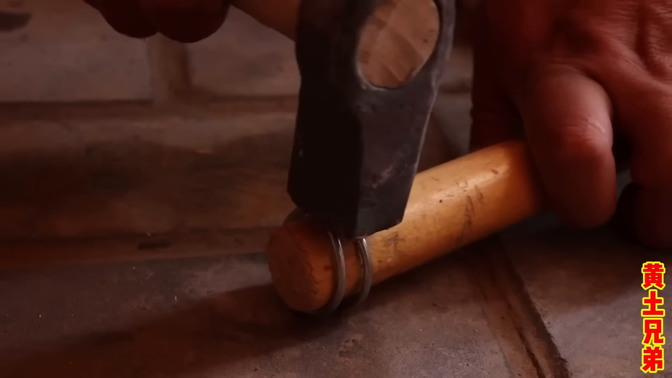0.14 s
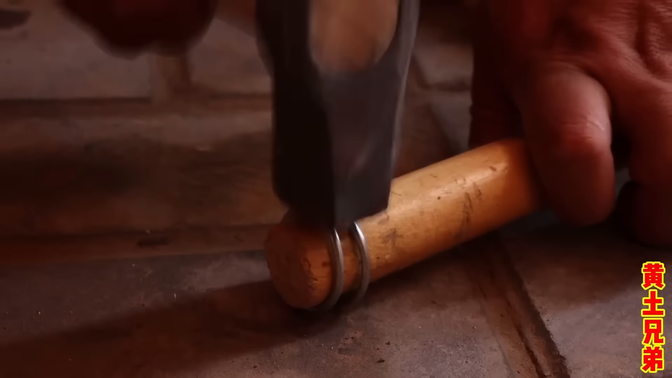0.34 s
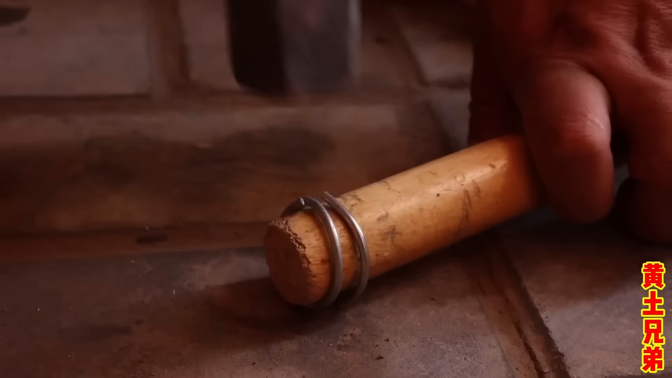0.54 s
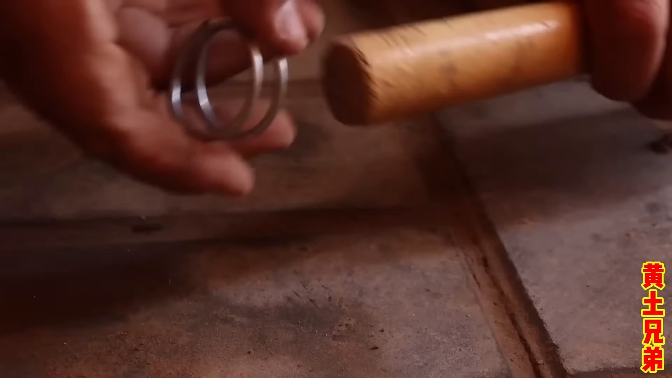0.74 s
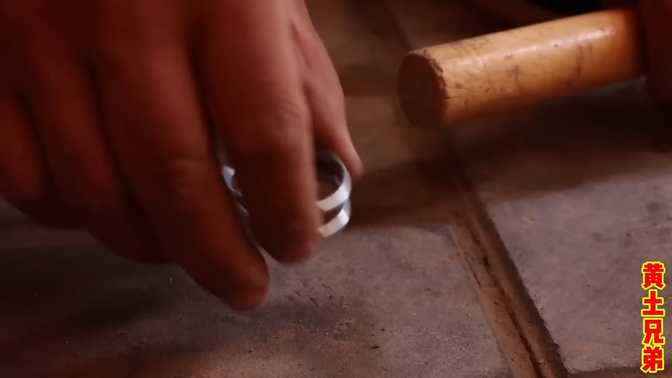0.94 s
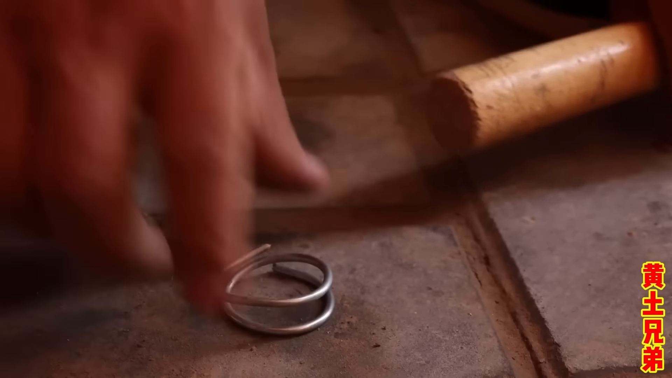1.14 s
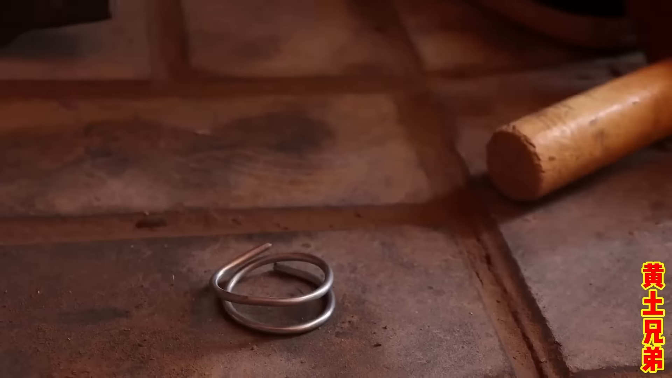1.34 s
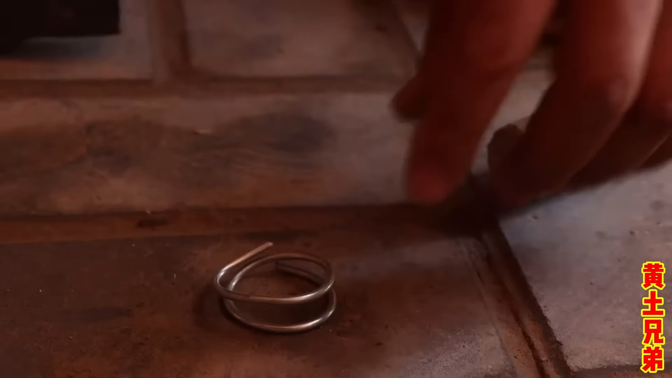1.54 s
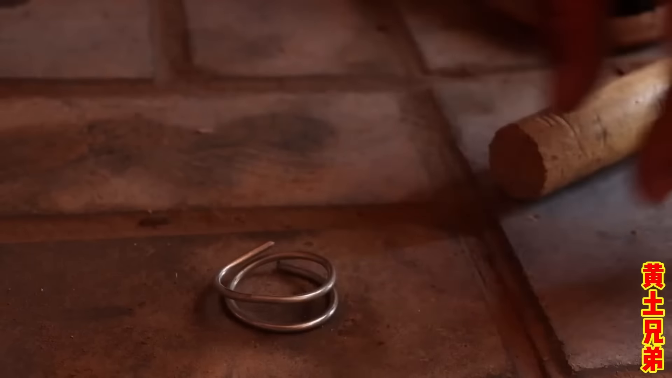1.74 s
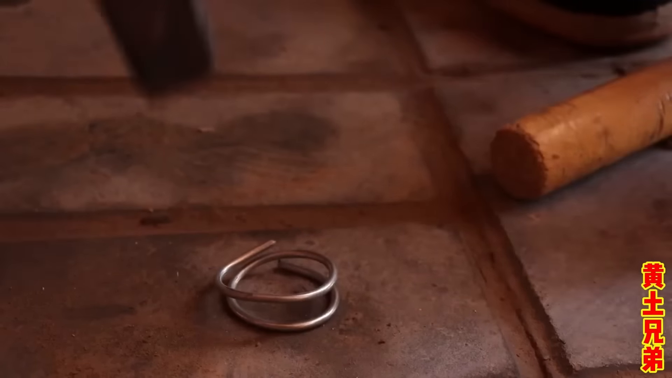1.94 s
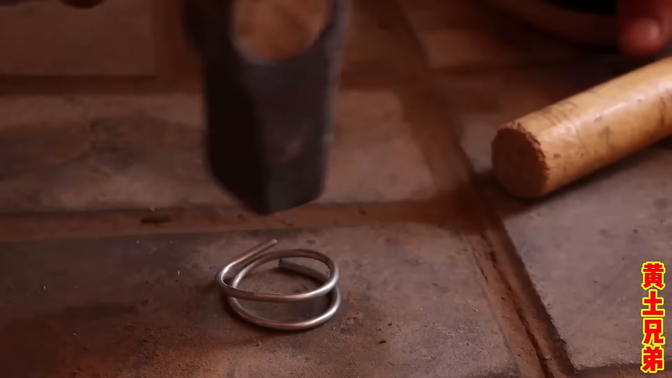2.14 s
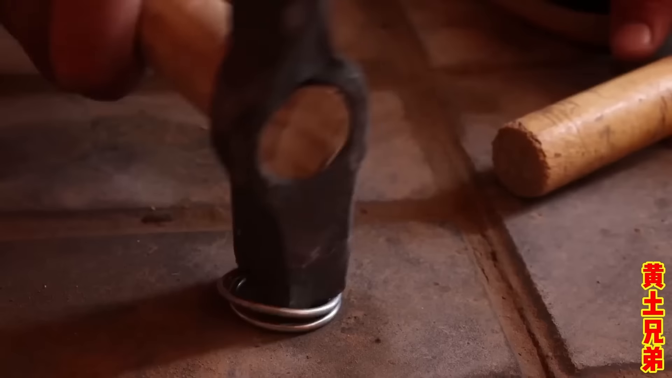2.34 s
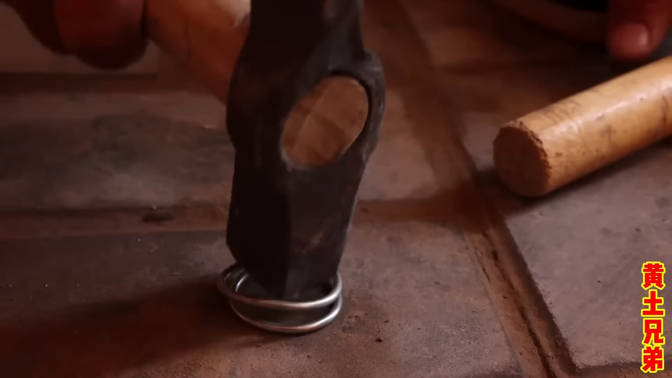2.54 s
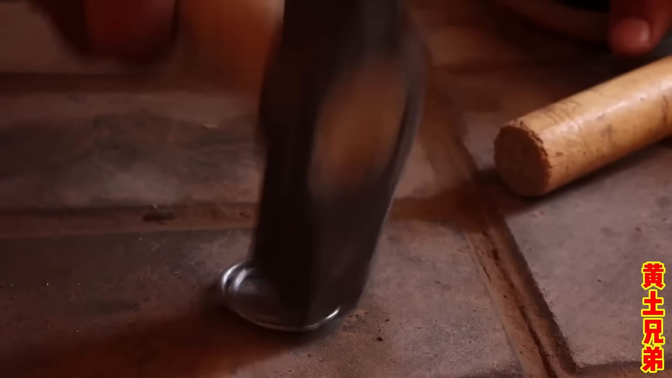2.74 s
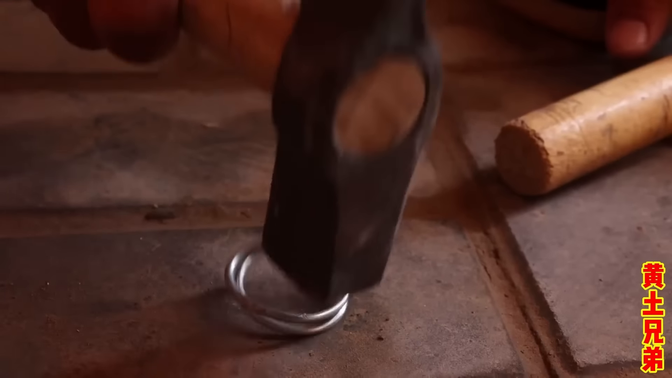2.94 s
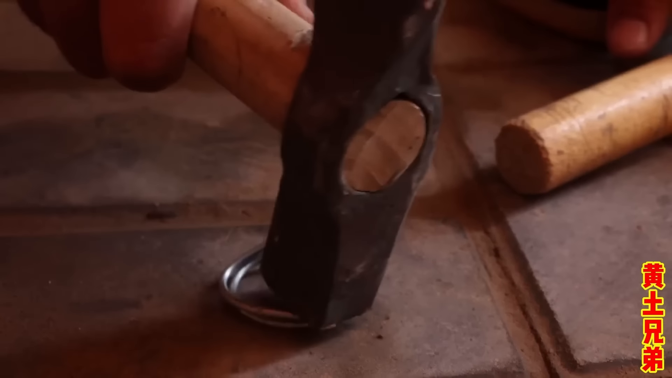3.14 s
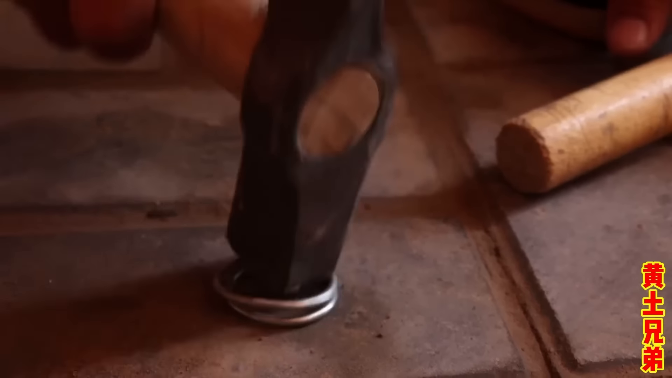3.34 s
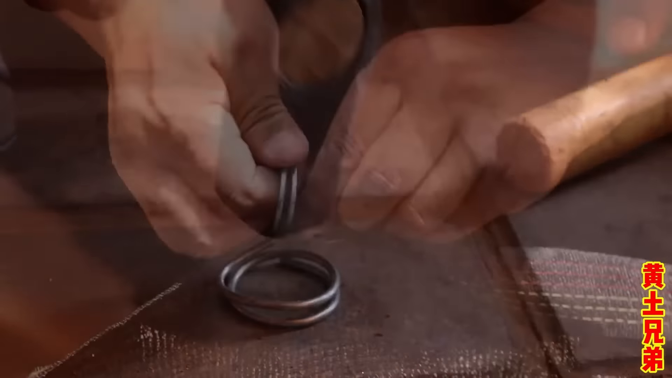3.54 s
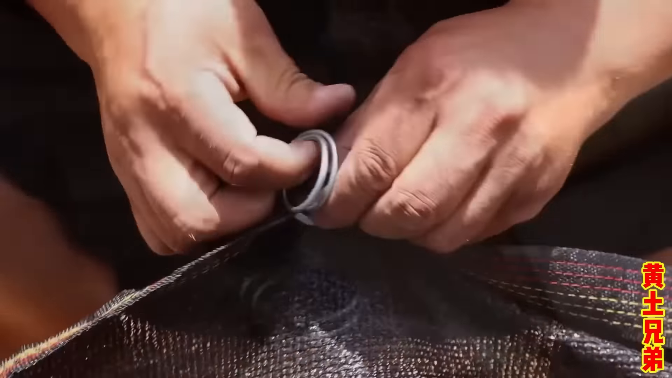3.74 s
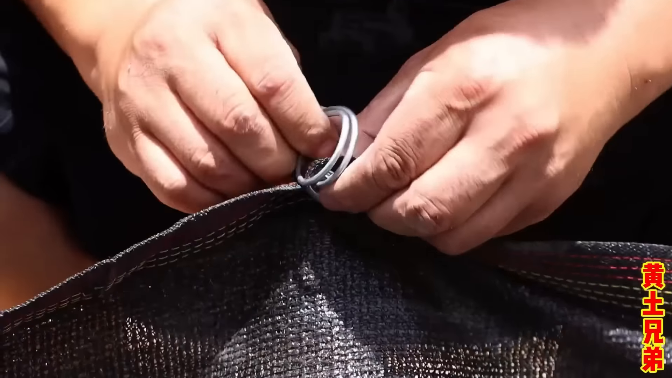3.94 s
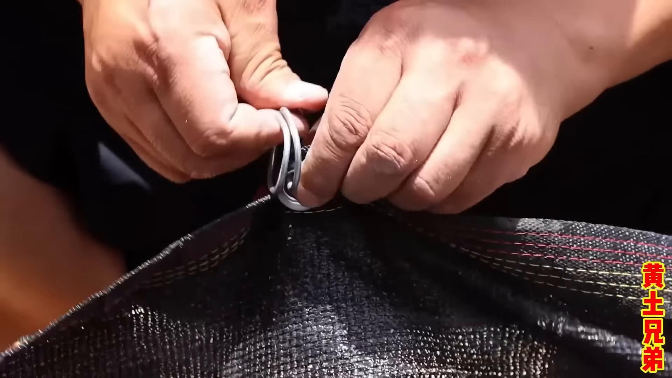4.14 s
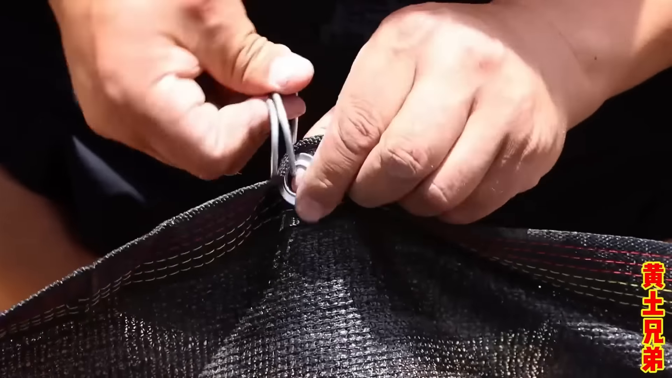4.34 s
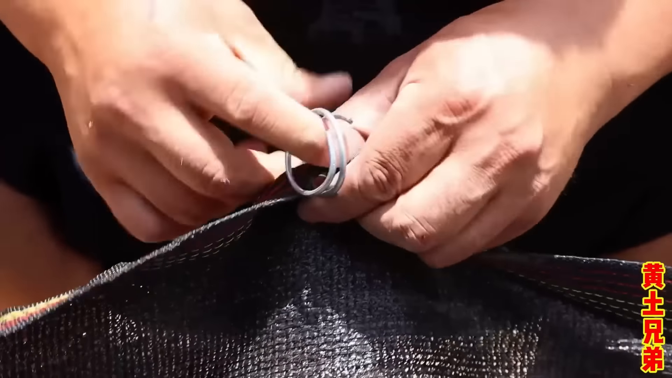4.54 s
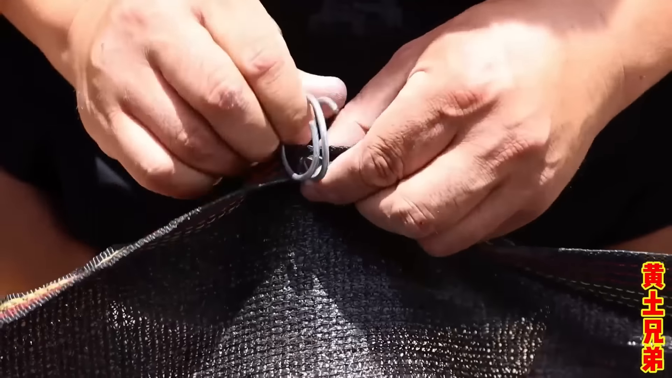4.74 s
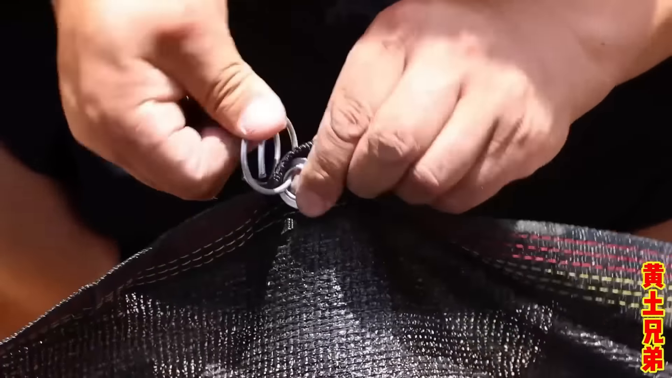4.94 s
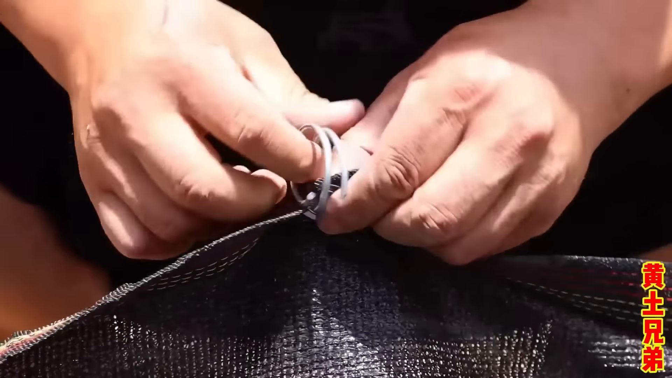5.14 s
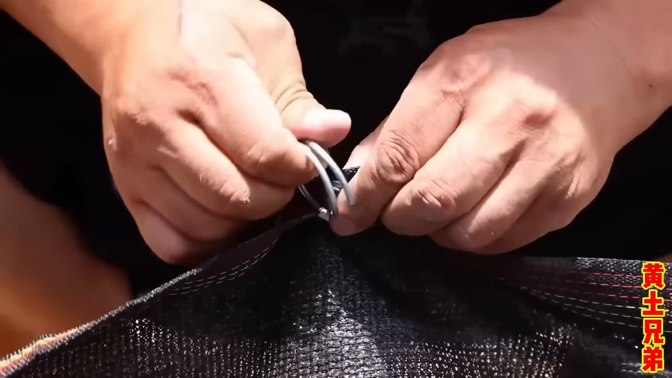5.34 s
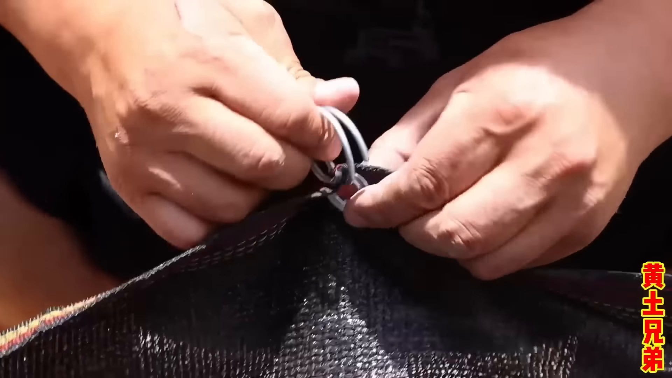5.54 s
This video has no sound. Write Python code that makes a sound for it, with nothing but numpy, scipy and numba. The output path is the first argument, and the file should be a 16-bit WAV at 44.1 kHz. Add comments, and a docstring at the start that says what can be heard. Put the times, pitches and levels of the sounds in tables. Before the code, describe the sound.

In an echoing brick porch a hammer taps a ringing wire coil, scrapes and strikes it, then a cut to faint clicks and insect chirps outdoors.

```python
"""Hammering a wire coil, then threading wire

In an echoing brick porch a hammer taps a wire coil on a dowel, the coil is scraped off, and the hammer
is picked up and flattens it on brick: noise bursts and fading sine waves, with an echo of fading noise.
Two quick cuts chop the tails. The second leads outdoors, where hands thread wire through a net: short noise
clicks and rubs, in light wind of low noise, with a high insect of pulsed noise and a far bird of gliding tones."""
import sys
import numpy as np
from scipy import signal
from scipy.fft import rfft, irfft
from scipy.io import wavfile
from scipy.ndimage import uniform_filter1d
from numba import njit

SR = 44100
rng = np.random.default_rng(int(sys.argv[2]) if len(sys.argv) > 2 else 0)


def store_pcm(level_fs):
    """Save levels as 16-bit WAV."""
    pcm = np.round(np.clip(level_fs, -1, 1) * 32767).astype(np.int16)
    wavfile.write(sys.argv[1], SR, np.atleast_2d(pcm).T)


N = 246588
T = np.arange(N) / SR  # time in seconds
LEAD = SR // 5  # samples ahead of time zero, for sounds that begin early
TOP_HZ = 16300  # highest pitch let through at the end
# Moments of the two cuts, in seconds: taps to hammering, then porch to yard.
CUTS_S = (.611, 3.872)

# Quiet air outdoors. Each row: pitch in Hz, relative strength in dB per Hz.
YARD_FLOOR = [(88, -21), (150, -9), (235, -1), (398, -7.5), (716, -7.5), (1170, -10.5), (2400, -11.5),
              (7180, -17), (10600, -10.5), (12400, -12), (16000, -51)]
YARD_DB, YARD_FADE_DB_PER_S = -60, 2.5
# Breeze on the microphone. Each row: time in seconds, rumble in dB.
BREEZE = [(3.88, -63), (4.08, -57.5), (4.3, -60), (4.5, -59), (4.6, -71), (4.66, -59), (4.95, -65.5),
          (5.25, -70), (5.59, -77)]
# Short puffs of wind. Each row: middle in seconds, rumble in dB, flutter against that rumble in dB.
PUFFS = [(4.141, -51, -9.5), (4.218, -67, 4), (4.3, -59, -7), (4.525, -67, 6), (4.688, -62.5, -28),
         (5.16, -65, -22.5)]
PUFF_S, BREEZE_FLUTTER_DB = 0.0199, -16
# Whistled bird notes. Each row: start in seconds, end in seconds, start pitch in Hz, end pitch in Hz, level in dB.
BIRD = [(4.19, 4.4, 2800, 2324, -69), (4.94, 5.003, 2496, 2418, -66), (5.265, 5.504, 2862, 2350, -67.5)]
# Insect chirps. Each row: start in seconds, time until it fades in seconds, level in dB.
CHIRPS = [(3.875, 0.04, -60.5), (3.975, 0.0453, -52), (4.11, 0.066, -66), (4.177, 0.047, -52),
          (4.25, 0.084, -52), (4.426, 0.08, -65.5), (4.508, 0.055, -53), (4.595, 0.029, -63.5),
          (4.704, 0.0568, -53), (4.833, 0.0505, -64), (4.939, 0.045, -50.5), (5.102, 0.053, -64),
          (5.14, 0.027, -51), (5.332, 0.0463, -50.5), (5.464, 0.028, -65), (5.522, 0.033, -50)]
CHIRP_ATTACK_S, CHIRP_RELEASE_S, CHIRP_PULSE_HZ, CHIRP_PULSE_DB = 0.0137, 0.0129, 400, 1
# Fingers on the net. Each row: middle in seconds, half length in seconds, pitch in Hz, level in dB.
RUBS = [(4.045, 0.0215, 3610, -61.5), (4.14, 0.017, 2100, -65.5), (4.204, 0.028, 1750, -63),
        (4.41, .02, 3580, -72.5), (4.624, 0.013, 2110, -68), (4.689, 0.018, 2110, -67),
        (4.955, 0.027, 1600, -69), (5.078, 0.07, 3200, -64), (5.349, 0.025, 3695, -66)]
RUSTLE_HZ, RUSTLE_WIDTH_HZ, RUSTLE_DB, RUSTLE_PATCHY_DB = 3220, 2000, -70, 4
# Wire on the net. Each row: time in seconds, relative level in dB, pitch in Hz.
CLICKS = [(4.019, -28.5, 5400), (4.135, -27, 2140), (4.343, -30, 2610), (4.446, -27.5, 2640),
          (4.515, -20.5, 1170), (4.609, -31, 2570), (4.6728, -32, 2050), (4.7331, -32.5, 2440),
          (4.99, -28, 7500), (5.0905, -29.5, 2600), (5.106, -29, 3270), (5.1968, -26, 3035)]

# Quiet air in the porch. Each row: pitch in Hz, relative strength in dB per Hz.
PORCH_FLOOR = [(15, -62), (25, -18.5), (200, -15), (293, -9), (503, -8), (659, -27.5), (1130, -9.5),
               (3820, -20), (11600, -19), (16000, -35.5)]
PORCH_DB = -63.5
# Porch echo. Each row: band in Hz, time to fade by 60 dB in seconds, relative level in dB,
# left-right likeness from 0 to 1.
PORCH = [(132.3, .9, 4, 0.99), (272.3, 0.82, -1, 1), (525.4, 0.6535, -0.5, 0.8), (970, 0.64, -5, 0.6),
         (1700, 0.65, -3.5, 0.3), (2852, 0.6, -6.5, .3), (4030, 0.57, -5.5, 0.3), (6100, .5, -11, .3),
         (8740, 0.54, -6.5, 0), (11800, 0.449, -9.5, 0.3)]
# Low modes of floor and walls. Each row: pitch in Hz, relative level in dB, time to fade by 60 dB in seconds.
BOOM = [(59, -15, 1), (111.6, -13, 0.75), (138.64, -3, 1), (183.4, -10, 1), (228.9, -3, 0.45),
        (263, -4, 0.18), (295, -15.5, 1)]
# Bands where the left port lies in the shadow of the body. Each row: middle in Hz, width in Hz.
LEFT_DIPS = [(2450, 890), (8500, 6700)]
SCATTER_MS, SCATTER_DB, SCATTER_HZ = 1.8, -0.5, 2200

# Taps on the coil round the dowel. Each row: start in seconds, relative level in dB, thump in dB, second rattle's
# fade in ms, its extra level in dB, its delay in ms, coil treble in dB per octave, favoured mode in Hz, its boost in dB.
TAPS = [(-0.09, -6.5, -22.5, 40.4, 0, 8.3, 2.5, 3082, 3.5), (0.171, -8, -2, 15, 5.5, 10.3, 2, 2739, 5.5),
        (0.435, -5.5, -2, 20, 0, 8.5, 3.2, 1632, 9)]
FIRST_RATTLE_MS = 8
# Ringing wire coil. Each row: pitch in Hz, relative level in dB, time to fade by 60 dB in seconds.
COIL = [(668, -9, .8), (1143, -9, .7), (1632, -8, .6), (1836, -13, .4), (2440, 1, .25), (2711, -9, .25),
        (2739, -5, .55), (3082, -3, .8), (3499, -12, .45), (3700, -4, .22), (4208, -15, .3),
        (4890, -12, .1), (5390, -15, .15), (6130, -16, .3), (6500, -12, .2), (6812, -5, .2),
        (6970, -14, .15), (7445, -5, .2), (8247, -9, .2), (8438, -8, .2), (8885, -7, .15), (9770, -14, .15),
        (10330, -5, .15), (10700, -11, .15), (11150, -12, .15), (11650, -14, .12)]
# Ringing wooden dowel. Each row: pitch in Hz, relative level in dB, time to fade by 60 dB in seconds.
DOWEL = [(682, -17, 0.037), (836, -4.5, 0.059), (1120, 1.5, 0.018), (1413, 3.5, 0.042),
         (1520.7, 1.5, 0.085), (1878, 3, 0.039), (2550, 7, 0.06)]
# The dull tail of a thud, already dying as the cut comes in: time in seconds, noise in dB, low boom in dB.
THUD_TAIL = (.616, 7.2, -34)
# Pressure of the scraping coil. Each row: time in seconds, level in dB, treble in dB, resonances in dB.
SCRAPING = [(0.612, -43, -17, -11.5), (0.628, -35.5, -15.5, -10), (0.67, -38, -26.5, -12.5),
            (0.69, -35, -9, -9.5), (0.784, -33, 5.5, -2), (0.822, -31.5, 6, -0.5), (0.876, -33.5, 5, 2.5),
            (0.896, -32, 5.5, 0), (1.01, -40, -2, 1), (1.066, -43, -11, -0.5), (1.084, -44, -8.5, -0.5),
            (1.092, -40.5, 1.5, -1.5), (1.126, -46.5, 1.5, -1.5), (1.146, -37.5, -1.5, -2),
            (1.185, -38.5, -1.5, -3), (1.212, -34, -0.5, -2.5), (1.292, -30, 2.5, 0), (1.366, -32, 2.5, -1),
            (1.424, -37, -9, -1.5), (1.454, -48, -10, -1), (1.598, -60, -17.5, -1.5),
            (1.634, -58.5, -1, -2.5), (1.68, -51, -2, -1.5)]
# Hiss of scraping. Each row: pitch in Hz, relative strength in dB per Hz.
SCRAPE_HISS = [(88, -19.5), (150, -21.5), (716, -12.5), (1020, -11), (1360, -9), (1500, -6.5), (1940, -2.5),
               (2600, -9.5), (4240, -14.5), (10400, -13), (14500, -12.5), (16000, -26.5)]
# Resonances while scraping. Each row: pitch in Hz, width in Hz, level in dB on the dowel, level in dB on the brick.
SCRAPE_RING = [(228, 34, -27.5, -22), (340, 11, -18.5, -14), (867, 16, -14, -20.5), (1025, 41, -23, -3.5),
               (1101, 50, -4, -7), (1270, 37, -20, -5.5), (1513.5, 61, 2, -0.5), (2568.4, 16, 2.5, -12.5),
               (2620, 48, -19.5, -7.5), (3107, 59, -9.5, -4), (3647, 30, -11, -8), (4562, 19, -25, -9),
               (5080, 33, -15, -18), (5276, 27, -9.5, -10), (6570, 55, -12, -17), (7184, 43, -7.5, -8.5),
               (7400, 32, -11, -6), (7913, 26, -5.5, -11.5), (8536, 38, -4, -9.5), (8530, 45, -9, -14),
               (9370, 60, -11.5, -6), (10144, 53, -2.5, -14), (10670, 98, -1.5, -7), (11430, 44, -8.5, -9)]
ONTO_BRICK_S, SCRAPE_FLICKER_DB = 1.26, 2.8
SCRAPE_ECHO_DB, SCRAPE_WIDE_DB = -2.5, -3  # share sent to the echo; sizzle that differs left and right
# Knocks and one soft rustle as the hammer is picked up. Each row: start in seconds, handle ring in dB,
# head ring in dB, noise in dB, noise's fade in ms, handle treble in dB per octave.
PICK_UP = [(1.691, -27, -29, 0.5, 6, 5.5), (1.696, -8.5, -29.5, 8, 6, 0.05),
           (2.023, -41, -65.5, -17.5, 5, -3), (2.13, -59.5, -68, -23, 40, 3.5)]
# Blows on the coil on brick. Each row: landing in seconds, thud in dB, coil crunch in dB, handle ring in dB,
# head ring in dB, handle treble in dB per octave, floor boom in dB, head ping in dB, head treble in dB per octave,
# favoured handle mode in Hz, its boost in dB.
BLOWS = [(2.409, 5.5, 12.5, -22.5, -25.5, 1, -22.5, -24.5, -40, 4592, 13.5),
         (2.848, 4, 13.5, -15.5, -26.5, -6.5, -23, -25.5, -50, 3017, 3),
         (3.146, 4.5, 13, -31, -29, -0.5, -24.5, -47.5, 29.5, 3017, 2),
         (3.441, 2.5, 10, -19.5, -20.5, -4, -29, -26.5, 70, 3017, 4),
         (3.7298, -14.5, 7.5, -36, -16.5, 10, -21.5, -23, 50, 2992, 5)]
CRUNCH_S = 0.0077  # the coil starts to close this long before the face lands
# Thud of the brick. Each row: pitch in Hz, relative level in dB, time to fade by 60 dB in seconds.
BRICK = [(311.9, -18, 0.017), (500, -12.5, 0.03), (801.5, -6.5, 0.019), (990, 9, 0.01075), (1334, 8, 0.012),
         (1646, -6, 0.015), (1928, -12.5, 0.016), (2410, -9.5, 0.01)]
# Hammer handle. Each row: pitch in Hz, relative level in dB, time to fade by 60 dB in seconds.
HANDLE = [(270, -16, .04), (511, -19, .05), (1082, -7, .08), (1870, -8, .06), (1955, -8, .05),
          (3017, 3, .06), (3240, -14, .05), (4592, -8, .1), (4910, -20, .07)]
# Hammer head. Each row: pitch in Hz, relative level in dB, time to fade by 60 dB in seconds.
HEAD = [(8300, -14, .1), (8815, -9, .1), (9463, -9, .11), (9891, 0, .12), (10080, -9, .06),
        (11400, -30, .04)]
# Lowest mode of the head. Each row: pitch in Hz, relative level in dB, time to fade by 60 dB in seconds.
PING = [(3715, 0, .05)]
HEAD_ECHO_DB = -5  # the head beams at the microphone and feeds the porch less
BEAT_SPREAD_HZ, BEAT_DEPTH = 22, .6  # each mode swells at its own random rate
FAVOUR_OCTAVES = .04  # reach of the mode that a striking spot favours


def undb(db):
    """Turn decibels into a multiplier."""
    return 10 ** (np.asarray(db, float) / 20)


def unit(x):
    """Scale a sound to an average (rms) level of 1."""
    return x / np.sqrt(np.mean(x ** 2))


def curve(rows):
    """Draw straight lines between the rows of a table over time, one curve per column."""
    s, *columns = np.transpose(rows)
    return [np.interp(T, s, c) for c in columns]


def band(x, hz, width, order=1):
    """Keep the pitches around a centre."""
    edges = np.clip([hz - width / 2, hz + width / 2], 10, SR * .49)
    return signal.sosfilt(signal.butter(order, edges, "band", fs=SR, output="sos"), x)


def walk(rate):
    """Random wander around zero with spread 1, from about `rate` smoothed steps a second."""
    k = int(SR / rate)
    steps = np.repeat(rng.standard_normal(N // k + 1), k)
    smooth = uniform_filter1d(uniform_filter1d(steps, k), k)
    return unit(smooth[:N])


def coloured(points, shape):
    """Noise with a given spectrum, rms 1."""
    log_hz = np.log(np.fft.rfftfreq(N, 1 / SR) + 1)
    hz, db = np.transpose(points)
    spectrum = rfft(rng.standard_normal(shape)) * undb(np.interp(log_hz, np.log(hz), db))
    return unit(irfft(spectrum, N))


def ring(modes, tilt_db=0, scatter_db=2, favour_hz=3000, favour_db=0, beat=BEAT_DEPTH):
    """Fading sines after one blow; each blow weights and detunes them a little, and the spot struck can favour one."""
    hz, db, t60 = np.transpose(modes)[:, :, None]
    level_chance, pitch_chance, beat_chance = rng.standard_normal((3, len(modes), 1))
    t = np.arange(SR * 3 // 4) / SR
    spot_db = favour_db * np.exp(-(np.log2(hz / favour_hz) / FAVOUR_OCTAVES) ** 2)
    gain = undb(db + scatter_db * level_chance + tilt_db * np.log2(hz / 3000) + spot_db)
    fade = np.exp(-np.log(1000) * t / np.minimum(t60, 1))
    sines = np.sin(2 * np.pi * hz * (1 + 0.00044 * pitch_chance) * t) * fade
    sines = sines * (1 + beat * np.sin(2 * np.pi * BEAT_SPREAD_HZ * beat_chance * t))
    return (gain * sines).sum(0) / np.sqrt((gain ** 2).sum())


def burst(ms):
    """A short shower of tiny contacts that dies away; total energy 1."""
    t = np.arange(SR // 10) / SR
    x = rng.standard_normal(len(t)) * rng.exponential(size=len(t)) * np.exp(-t * 1000 / ms)
    return x / np.sqrt((x ** 2).sum())


def add(track, s, x):
    """Mix a sound into a track at a given second."""
    i = LEAD + int(s * SR)
    track[i:i + len(x)] += x[:len(track) - i]


def ports(x, delay_samples, shade_db):
    """A source on the right reaches the left port late and shaded; floor and hands scatter treble unlike to each."""
    body = signal.sosfilt(signal.butter(1, SCATTER_HZ, fs=SR, output="sos"), x)
    treble = band(x, 4 * SCATTER_HZ, 6 * SCATTER_HZ, order=3)
    side = undb(SCATTER_DB) * signal.fftconvolve(treble, burst(SCATTER_MS))[:len(x)]
    left = np.roll(body, shift=delay_samples) + x - body + side  # only the lower part is delayed
    shaded = sum(band(left, hz, width) for hz, width in LEFT_DIPS)
    return np.array([left - (1 - undb(shade_db)) * shaded, x - side])


def yard_air():
    """Open air is a steady coloured noise whose level wanders and slowly sinks."""
    swell_db = 2.2 * walk(5.3)
    level_db = YARD_DB - YARD_FADE_DB_PER_S * (T - CUTS_S[1]) + swell_db
    return undb(level_db) * coloured(YARD_FLOOR, (2, N))


def wind():
    """A breeze rumbles on the ports and dies down; short puffs thump and flutter."""
    s, db, flutter_db = np.transpose(PUFFS)[:, :, None]
    puffs = undb(db) * np.exp(-((T - s) / PUFF_S) ** 2)
    breeze = undb(curve(BREEZE)[0] + 4.1 * walk(15))
    flutter = (puffs * undb(flutter_db)).sum(0) + breeze * undb(BREEZE_FLUTTER_DB)
    gust = rng.standard_normal((2, N)) + 0.785 * rng.standard_normal(N)  # partly shared by left and right
    rumble = (puffs.sum(0) + breeze) * unit(band(gust, 81, 96, order=2))
    return rumble + flutter * undb(5.26 * walk(25)) * unit(band(gust, 200, 154))


def far_bird():
    """A whistle is one sine gliding down in pitch, with a slight waver and a patchy level."""
    bird = 0
    for s0, s1, hz0, hz1, db in BIRD:
        u = np.clip((T - s0) / (s1 - s0), 0, 1)  # progress through the note
        hz = (hz0 + (hz1 - hz0) * u) * (1 + 0.03 * walk(300) + .012 * walk(25))
        patchy_db = 3.2 * walk(35) + 4 * walk(300)
        swell = np.sin(np.pi * u) ** 0.409
        bird = bird + undb(db + patchy_db) * swell * np.sin(2 * np.pi * np.cumsum(hz) / SR)
    return bird


def insect():
    """Short chirps near 10 kHz, each noise in a narrow band, throbbing with quick wing pulses."""
    s, length, db = np.transpose(CHIRPS)[:, :, None]
    rise = np.clip((T - s) / CHIRP_ATTACK_S, 0, 1)
    shape = rise * np.exp(-np.clip(T - s - length, 0, None) / CHIRP_RELEASE_S)
    pulses = np.sin(2 * np.pi * np.cumsum(CHIRP_PULSE_HZ * (1 + 0.0573 * walk(40))) / SR)
    throb = undb(0.83 * walk(140) + CHIRP_PULSE_DB * pulses)
    buzz = band(band(rng.standard_normal(N), 9274, 2700, order=2), 12100, 1710)
    buzz = (buzz + 0.94 * band(buzz, 10600, 700)) * throb
    return unit(buzz) * (undb(db) * shape).sum(0)


def rustle():
    """The net rustles as patchy noise under the fingers, and some rubs stand out."""
    grit = rng.standard_normal((2, N)) * undb(RUSTLE_PATCHY_DB * walk(20) + 3.13 * walk(360))
    fine = rng.standard_normal((2, N)) * undb(2.7 * walk(200))
    rubs = 0
    for s, length, hz, db in RUBS:
        swell = np.exp(-((T - s) / length) ** 2)
        rubs = rubs + undb(db) * swell * unit(band(fine, hz, hz * 0.24, order=2))
    return undb(RUSTLE_DB) * unit(band(grit, RUSTLE_HZ, RUSTLE_WIDTH_HZ)) + rubs


def wire_clicks():
    """Wire ticks on the net: a tiny noise burst with one band of pitches made stronger."""
    near = np.zeros(LEAD + N)
    for s, db, hz in CLICKS:
        tick = burst(4.5)
        add(near, s, undb(db) * (band(tick, hz, hz * 0.45) + 0.6 * tick))
    return near[LEAD:]


def yard():
    """Insect, wind, rustling net, wire clicks and a falling bird whistle add up over open air."""
    near = ports(insect() + wire_clicks(), delay_samples=1, shade_db=0.0)
    return near + far_bird() + rustle() + wind() + yard_air()


def porch_air():
    """The quiet porch is soft coloured noise with a slowly wandering level."""
    return undb(PORCH_DB + walk(0.6)) * coloured(PORCH_FLOOR, (2, N))


def porch(near, boom, wet_db, rise_ms):
    """Direct sound, bands of dying echo that build up first, and the low modes of floor and walls."""
    t, echo = np.arange(SR) / SR, 0
    for hz, t60, db, like in PORCH:
        mid, side = band(rng.standard_normal((2, SR)), hz, hz * 0.54, order=2)
        like = np.clip(like, 0, 1)
        pair = np.sqrt(1 + like) * mid + np.sqrt(1 - like) * side * np.array([[1], [-1]])
        echo = echo + undb(db) * pair * np.exp(-np.log(1000) * t / t60)
    near = signal.sosfilt(signal.butter(3, 130, "high", fs=SR, output="sos"), near)  # small things shed no bass
    echo = echo * (1 - np.exp(-t * 1000 / rise_ms)) / np.sqrt(SR)
    wet = signal.fftconvolve(near, echo, axes=1)[:, :len(boom)]
    return (near + boom + undb(wet_db) * wet)[:, LEAD:]


def push(x):
    """The floor is pushed for a few ms and springs back, so its ring starts softly and without deep bass."""
    shape = np.hanning(int(0.0032 * SR))
    soft = np.convolve(x, shape / shape.sum())
    return signal.sosfilt(signal.butter(3, 85, "high", fs=SR, output="sos"), soft)


def taps():
    """The loose coil rattles twice on the dowel and rings on, while dowel and floor ring from the knock."""
    near, boom = np.zeros((2, LEAD + N))
    for s, db, thump_db, ms, again_db, again_ms, tilt_db, favour_hz, favour_db in TAPS:
        again_s = s + again_ms / 1000
        add(near, s, undb(db + 17.0) * band(burst(FIRST_RATTLE_MS), 5170, 9280))
        add(near, again_s, undb(db + again_db + 17.0) * band(burst(ms), 5170, 9280))
        add(near, again_s, undb(db + again_db - 13) * ring(COIL, tilt_db, 1, favour_hz, favour_db, beat=.25))
        add(near, s, undb(db - 2.5) * signal.fftconvolve(burst(2.2), ring(DOWEL)))
        add(boom, s, undb(db + thump_db - 14.5) * push(ring(BOOM)))
    return porch(ports(near, delay_samples=3, shade_db=-6.0), boom, wet_db=8.02, rise_ms=2.1)


def scrape():
    """Stick-slip grit drives hiss and the wire's narrow resonances; a sizzle unlike left and right comes second."""
    db, treble_db, ring_db = curve(SCRAPING)
    gain = undb(db) * (T > CUTS_S[0]) * (T < PICK_UP[0][0])
    grit = undb(.7 * walk(70) + 2.5 * walk(500))
    sound = coloured(SCRAPE_HISS, N) * grit
    sizzle = unit(band(coloured(SCRAPE_HISS, N) * grit, 9280, 12000, order=2))
    brick = np.clip((T - ONTO_BRICK_S) / .05 + .5, 0, 1)  # 0 on wood, 1 on brick
    for hz, width, wood_db, brick_db in SCRAPE_RING:
        drive = rng.standard_normal(N) * grit * undb(SCRAPE_FLICKER_DB * walk(19.0))
        level_db = wood_db + (brick_db - wood_db) * brick + ring_db
        sound = sound + undb(level_db) * unit(band(drive, hz, width))
    low = unit(band(sound, 1500, 3000, order=2))
    high = unit(band(sound, 9280, 12000, order=2))
    return gain * (low - undb(treble_db) * high), gain * undb(treble_db + SCRAPE_WIDE_DB) * sizzle


def crunch():
    """The turns of the coil close up ever louder until the face lands, then the rattle dies."""
    t = np.arange(SR // 10) / SR
    closing = np.clip(0.16 + t / CRUNCH_S, 0, 1) ** 3.03
    return band(burst(5.5) * closing, 6300, 11000, order=2)


def hammering():
    """A thud's tail, the scrape, the hammer picked up, then blows: coil crunch, brick thud, head and handle."""
    drag, wide, lift, near, head, boom = np.zeros((6, LEAD + N))
    drag[LEAD:], wide[LEAD:] = scrape()
    tail_s, tail_db, tail_boom_db = THUD_TAIL
    add(drag, tail_s, undb(tail_db) * band(burst(43), 1150, 1700, order=2))
    add(boom, tail_s, undb(tail_boom_db) * push(ring(BOOM, tilt_db=15.0)))
    for s, handle_db, head_db, noise_db, ms, tilt_db in PICK_UP:
        add(lift, s, undb(handle_db) * ring(HANDLE, tilt_db, scatter_db=-1.5))
        add(lift, s, undb(head_db) * ring(HEAD, scatter_db=1, favour_hz=10000, favour_db=9.5))
        add(lift, s, undb(noise_db) * band(burst(ms), 2600, 4600, order=2))
    for (s, db, crunch_db, handle_db, head_db, tilt_db, boom_db, ping_db,
         head_tilt_db, favour_hz, favour_db) in BLOWS:
        add(near, s - CRUNCH_S, undb(crunch_db) * crunch())
        add(near, s, -undb(db) * ring(BRICK, scatter_db=1.5))
        add(near, s, undb(handle_db) * ring(HANDLE, tilt_db, 1, favour_hz, favour_db))
        add(head, s, undb(head_db) * ring(HEAD, head_tilt_db) + undb(ping_db) * ring(PING))
        add(boom, s, undb(boom_db) * push(ring(BOOM)))
    drag = ports(drag, delay_samples=4, shade_db=-11.5) + wide * np.array([[.6], [-.6]])
    lift = ports(lift, delay_samples=0, shade_db=-2.0)
    near = ports(near, delay_samples=1, shade_db=-2.5)
    head = ports(head, delay_samples=1, shade_db=-0.5)
    drag_share, head_share = undb(SCRAPE_ECHO_DB), undb(HEAD_ECHO_DB)
    echoed = porch(drag_share * drag + lift + near + head_share * head, boom, wet_db=9.43, rise_ms=16.0)
    direct_only = (1 - head_share) * head + (1 - drag_share) * drag
    return echoed + direct_only[:, LEAD:]


def scene():
    """Taps, hammering and yard follow one another, joined by two very short crossfades."""
    first, second = (np.clip((T - s) / 0.0018, 0, 1) for s in CUTS_S)
    return (1 - first) * taps() + (1 - second) * (first * hammering() + porch_air()) + second * yard()


@njit
def follow(x, attack, release):
    """Peak follower, quick up and slow down."""
    e, y = 0., np.empty(len(x))
    for i in range(len(x)):
        e += (x[i] - e) * (attack if x[i] > e else release)
        y[i] = e
    return y


def record(dry):
    """Gain control ducks after peaks, the loudest are rounded, the top droops and is cut."""
    dull = signal.sosfilt(signal.butter(2, 12500, fs=SR, output="sos"), dry)
    loud = follow(np.abs(dull).max(0), 1 / (.004 * SR), 1 / (.04 * SR))  # 4 ms up, 40 ms down
    ducked = dull * np.minimum(1, undb(-4) / (loud + 1e-9)) ** .3
    return signal.sosfilt(signal.ellip(8, .2, 70, TOP_HZ, fs=SR, output="sos"), np.tanh(ducked))


dry = scene()
out = record(dry)
store_pcm(out)
```